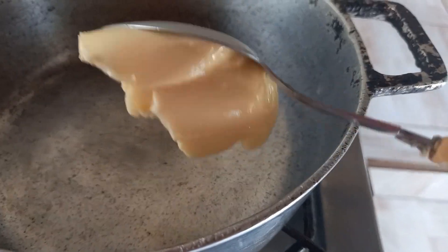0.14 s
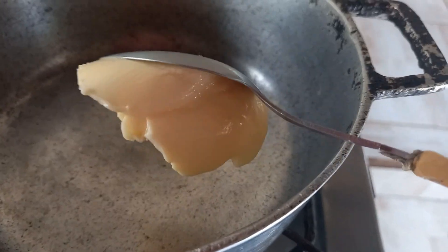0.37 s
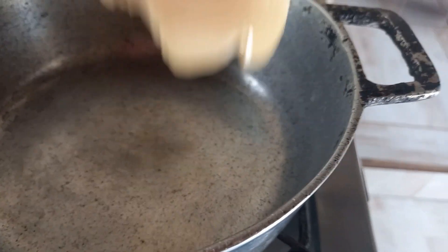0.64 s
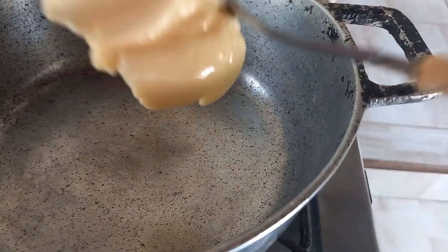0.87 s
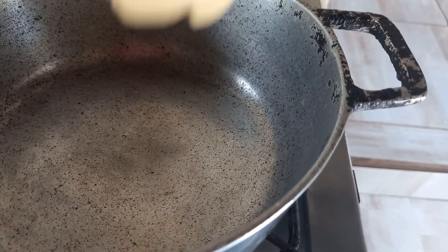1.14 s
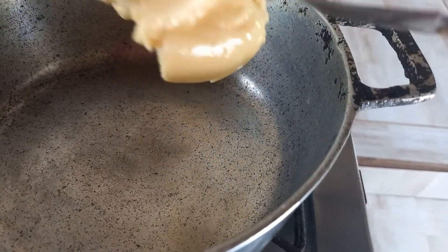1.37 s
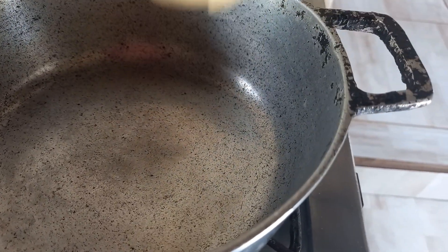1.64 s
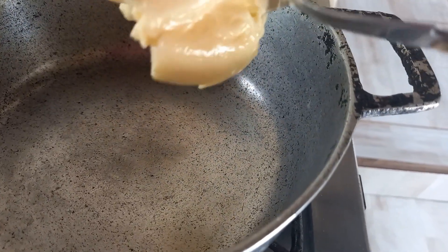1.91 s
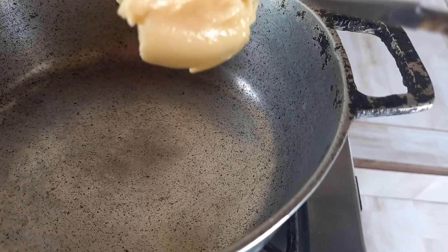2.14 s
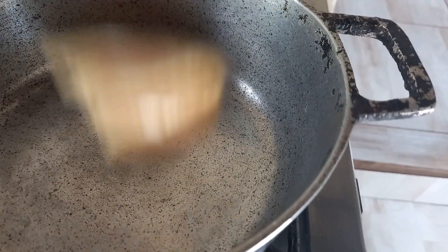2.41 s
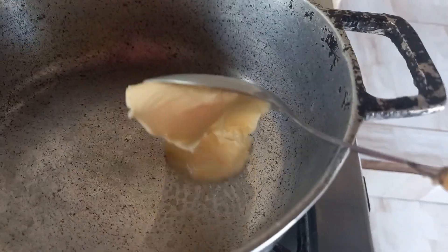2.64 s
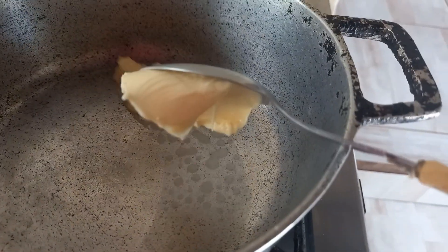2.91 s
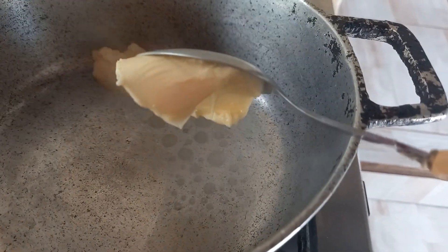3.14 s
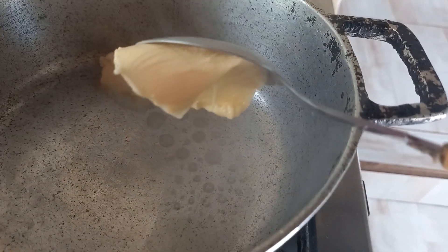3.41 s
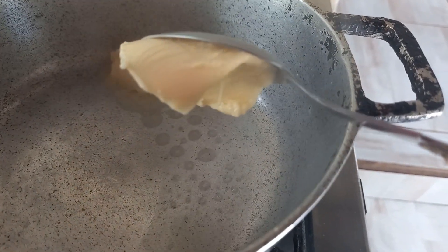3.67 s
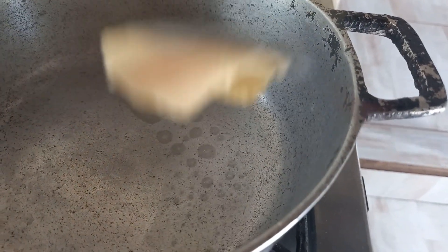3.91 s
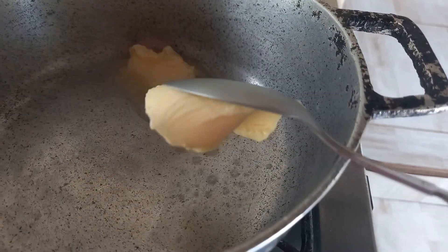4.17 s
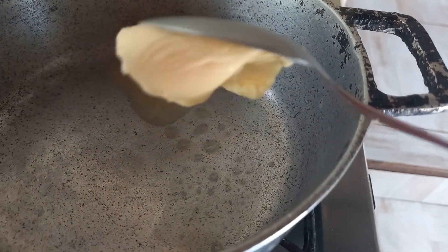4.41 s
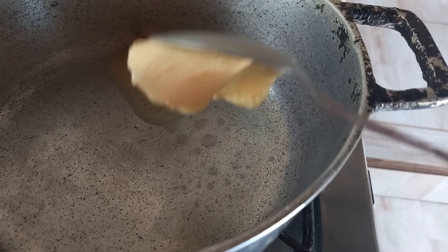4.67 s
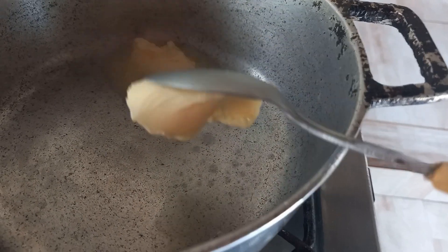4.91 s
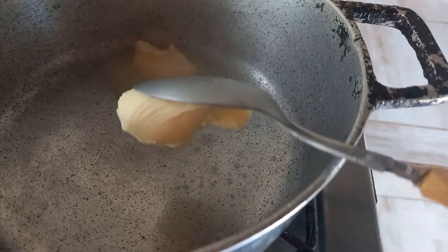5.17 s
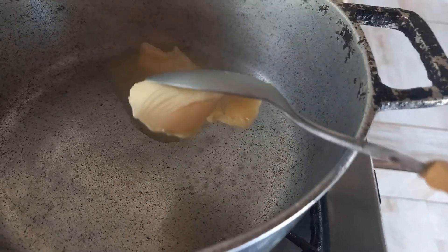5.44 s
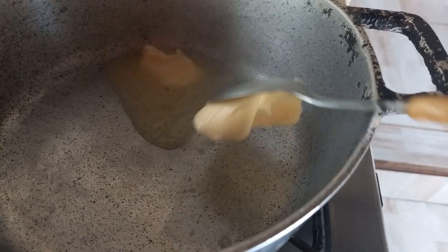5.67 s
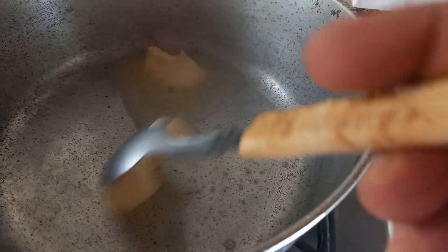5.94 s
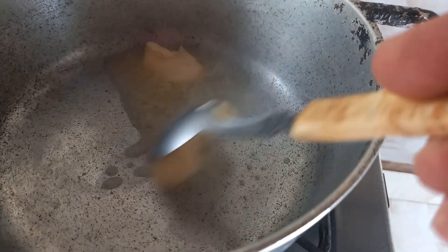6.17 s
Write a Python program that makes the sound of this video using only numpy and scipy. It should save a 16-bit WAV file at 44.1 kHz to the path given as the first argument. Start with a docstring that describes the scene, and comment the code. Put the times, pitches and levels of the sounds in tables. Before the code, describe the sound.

Close to a small microphone in a hard-walled kitchen, a metal spoon knocks a pot that rings and rattles on its stove grate. A bird trills outside over low traffic and gas hiss. A hard double clang and soft slap follow as fat lands, then sizzling grows through more knocks, ending in sharp spits.

```python
"""A spoon knocks on the rim of a hot metal pot on a gas stove, close to a small microphone: decaying sines
ring as pot and spoon modes, noise bursts make the contact, and the pot rocks on its grate and shakes the stove top.
Fat drops in with a slap and sizzles as random clicks, louder as it melts, with a few loud spits; the flame is hiss.
Beyond the kitchen a bird trills, filtered noise and low swelling tones make traffic, and a far engine's
harmonics slowly rise. Soft bumps on the stove and one finger tap on the microphone case are heard too."""
import sys
import numpy as np
from scipy import signal
from scipy.fft import rfft, irfft
from scipy.io import wavfile

SR = 44100
rng = np.random.default_rng(int(sys.argv[2]) if len(sys.argv) > 2 else 0)


def volts(x):
    """Linear amplitude factor 10**(x/20) for a level x in dB, scalar or array-like."""
    e = np.asarray(x, float) / 20
    return 10 ** e


def unload_audio(sound):
    """Save the sound as a 16-bit wav file, at the path given as the first command line argument."""
    columns = np.transpose(np.atleast_2d(sound))
    # keep every value between -1 and 1, then stretch to whole-number steps
    steps = np.round(np.clip(columns, -1, 1) * 32767)
    wavfile.write(sys.argv[1], SR, steps.astype(np.int16))


N = 278376
TIME_S = np.arange(N) / SR
SIDES = np.array([[1], [-1]])   # left, right
FAT_LANDS_S = 2.52

# spoon on pot, the first already ringing at the start: start_s, level_db, hum_db (pot modes at 500-1000 Hz),
# bright_db (high spoon modes and tick), bowl_db (clang of the bowl), freedom of the pot to ring (0-1)
BLOWS = [(-0.22, -13, -33, -5, 0, 0.74), (0.1048, -17.5, -30, -2.5, -2, 0.94),
         (0.2969, -16.5, -10, -4.5, 2.5, 0.81), (0.5113, -36.5, -30, 9, -2, 0.76),
         (0.6395, -42.5, -20, 12.5, 3, 0.9), (0.785, -48.5, -19, 3, -1, 0.7),
         (2.4959, -11, -12.5, 7.5, 9.5, 1), (2.7035, -37, 9, 3, 7, 0), (4.0157, -12.5, -7, 9.5, 1, 0.22),
         (4.548, -12.5, -14, 6.5, 0, 0.7), (4.8869, -11, -20, -8, -16, 0.77),
         (5.1654, -12, -9, 3.5, -6, 0.2), (5.728, -20.5, 2.5, 8.5, -15, 0.87),
         (5.9377, -32, -13, 17, -6, 0), (6.198, -31, -15, 5, -6, 0.4)]
# ringing modes of the pot: pitch_hz, level_db, undamped t60_s, left_over_right_db, left_leads_rad
POT_MODES = [(320, -13, 2., 0, .4), (828, -3, 2.7, 6, .9), (833, -12, 1.5, 3, 0), (1281, -4, 1., -4, .1),
             (1319, -13, 1.9, 2, .7), (1331, -9, 1.6, 0, .3), (1533, -3, 1.2, 0, -1.1),
             (1772, -5, .5, -2, -.6), (2384, -8, .5, 1, -.5), (3289, -9, .5, 9, 2.5),
             (4151, -4, .3, 6, 1.3), (5480, -9, .2, 1, -.2)]
# ringing modes of the spoon: pitch_hz, level_db, t60_s (shortened a little at each use),
# left_over_right_db, left_leads_rad
SPOON_MODES = [(1333, -2, .36, 3, .7), (1504, -6, .36, -7, -.9), (2177, 2, .22, 0, 1.2),
               (2210, -7, .2, 8, .2), (2520, -4, .24, 0, -.3), (3365, -19, .3, 4, .5),
               (4433, 0, .24, 7, 1.), (4950, -12, .2, -7, -2.5), (5181, -3, .12, -6, -.6),
               (5800, -9, .25, 9, -2.5), (6345, -13, .18, 14, -1.6), (6690, -12, .16, 15, -.3),
               (6950, -18, .16, 15, -1.5)]
# colour of the bursting steam bubbles: pitch_hz, density_db (per Hz)
SIZZLE_COLOUR = [(600, -33), (1000, -21.5), (1500, -15.5), (1950, -21), (2400, -12.5), (3400, -11),
                 (4700, -2), (6200, 0), (6900, -2.5), (7300, -13.5), (9000, -6.5), (12300, 0), (15300, -2)]


def at_hz(points, hz):
    """Reads a (Hz, value) table on a log axis."""
    table_hz, values = np.transpose(points)
    return np.interp(np.log(hz + 1), np.log(table_hz), values)


def rms_one(x):
    """Scales to rms 1."""
    return x / np.sqrt(np.mean(x ** 2) + 1e-20)


def drift(rate):
    """Slow random wander of spread 1 that turns about rate times a second."""
    return np.interp(TIME_S * rate, np.arange(400), rng.standard_normal(400))


def coloured(pair, spectrum, lean=((100, 0), (1000, 0))):
    """Mixes two unrelated signals into left and right, most alike in the bass, with a spectrum and a lean."""
    # how alike the two sides are: pitch_hz, likeness (-1 to 1)
    likeness = [(60, 0.87), (180, 1), (550, 0.54), (1650, 0.13), (4970, -0.086), (15000, 0.0056)]
    mid, side = rfft(pair)
    hz = np.arange(len(mid)) * SR / pair.shape[1]
    alike = at_hz(likeness, hz)
    both = np.sqrt(1 + alike) * mid + np.sqrt(1 - alike) * side * SIDES
    gain = volts(at_hz(spectrum, hz) + at_hz(lean, hz) * SIDES / 2)
    return rms_one(irfft(both * gain, pair.shape[1]))


def ring(x, hz, t60):
    """A resonance: a unit click sets a sine of height about 1 ringing."""
    r = volts(-60 / (t60 * SR))
    w = 2 * np.pi * hz / SR
    return signal.lfilter([0, np.sin(w)], [1, -2 * r * np.cos(w), r * r], x + 1e-18)


def add(out, s, sound):
    """Mixes a sound in at time s; a part before the start is lost."""
    i = round(s * SR)
    sound = sound[..., max(-i, 0):N - i]
    out[..., max(i, 0):max(i, 0) + sound.shape[-1]] += sound


def add_mode(out, s, db, hz, t60, lean_db, lead):
    """A dying sine, heard with its own level and phase at each side."""
    t = np.arange(int(t60 * SR)) / SR
    envelope = volts(db + lean_db * SIDES / 2 - 60 * t / t60)
    add(out, s, envelope * np.sin(2 * np.pi * hz * t + lead * SIDES / 2))


def fading(t60, size=16384):
    """An envelope that dies away by 60 dB in t60 seconds."""
    return volts(-60 * np.arange(size) / SR / t60)


def burst(spectrum, t60, size=16384):
    """Coloured noise that dies away."""
    return coloured(rng.standard_normal((2, size)), spectrum) * fading(t60, size)


def swell(s, half_s):
    """A smooth rise and fall around time s."""
    return np.cos(np.pi / 2 * np.clip((TIME_S - s) / half_s, -1, 1)) ** 2


def wavering(hz):
    """A steady tone that wanders a little in pitch, level and side."""
    phase = 2 * np.pi * np.cumsum(hz + 4.02 * drift(8)) / SR
    lead = 0.35 * drift(3) * SIDES
    return np.sqrt(2) * volts(1.3 * drift(11)) * np.sin(phase + lead)


def kitchen(x):
    """Hard walls return a diffuse tail, octave bands of noise that mostly die sooner in the treble."""
    # reverberation of the room: pitch_hz, t60_s
    room_t60 = [(100, 1), (500, 0.44), (2000, 0.51), (6000, 0.23), (14000, 0.027)]
    t, tail = np.arange(SR) / SR, 0
    for hz in 60 * 2. ** np.arange(9):
        band = [(hz / 2, -40), (hz / 1.42, -3), (hz, 0), (hz * 1.42, -3), (hz * 2, -40)]
        t60 = at_hz(room_t60, hz)
        noise = coloured(rng.standard_normal((2, SR)), band)
        tail = tail + np.sqrt(hz / t60) * noise * volts(-60 * t / t60)
    tail = tail * (1 - np.exp(-t / 0.00027))
    tail = tail / np.sqrt((tail ** 2).sum(axis=1).mean())
    return signal.fftconvolve(x.mean(axis=0, keepdims=True), tail, axes=1)[:, :N]


def street():
    """Traffic rumble and low swells; the two lowest room resonances boom on after each knock."""
    # low booms from outside: loudest_s, half_length_s, level_db, pitch_hz
    swells = [(1.117, 0.52, -49.5, 107.8), (1.14, 0.08, -46.5, 75.6), (1.86, 0.52, -58.5, 79.2),
              (3.787, 0.066, -53, 80), (4.422, 0.25, -46, 79), (4.74, 0.19, -32.5, 82),
              (4.974, 0.51, -40.5, 80.56), (5.6, 0.077, -46, 92.2), (5.814, 0.22, -37.5, 98),
              (6.274, 0.34, -45.5, 104)]
    # colour of the traffic: pitch_hz, density_db (per Hz)
    rumble_colour = [(15, -59), (25, -7.5), (82, 0.5), (216, -13.5), (262, -8.5), (328, -13.5), (405, -15),
                     (750, -46), (1200, -51), (1560, -62), (2640, -120)]
    # lowest room resonances: pitch_hz
    room_hz = (84.2, 101.1)
    boom_db, rise_s, free_t60_s = -21, 0.027, 1   # the room's boom, longest when the pot is free
    steady_db, swelling_db = -57.5, -10   # constant rumble; broad part that comes with each boom
    after, t = np.zeros(N), np.arange(2 * SR) / SR
    for s, db, *_, free in BLOWS:
        t60 = free_t60_s * max(free, .25)
        add(after, s, volts(db + boom_db - 60 * t / t60) * (1 - np.exp(-t / rise_s)))
    booms = after * sum(wavering(hz) for hz in room_hz)
    busy = after
    for s, half_s, db, hz in swells:
        envelope = volts(db) * swell(s, half_s)
        booms = booms + envelope * wavering(hz)
        busy = busy + envelope
    rumble = coloured(rng.standard_normal((2, N)), rumble_colour) * volts(2.5 * drift(6))
    return booms + (volts(steady_db) + volts(swelling_db) * busy) * rumble


def engine():
    """Far off, a few multiples of the slowly rising firing rate reach the kitchen, fading in and out."""
    # harmonics that come and go: multiple, loudest_s, half_length_s, level_db (rms)
    harmonics = [(3, 0.48, 0.41, -47.5), (6, 0.9, 0.39, -60.5), (3, 1.56, 0.49, -61.5), (5, 1.7, 0.17, -61)]
    firing_hz = 52.7 + 1.2 * (TIME_S - 0.341)   # 52.7 Hz at 0.341 s, rising 1.2 Hz per second
    phase = 2 * np.pi * np.cumsum(firing_hz) / SR
    return sum(np.sqrt(2) * volts(db) * swell(s, half_s) * np.sin(k * phase) for k, s, half_s, db in harmonics)


def bird():
    """Each chirp starts on its top note, then trills fast and unevenly down and back, deepest in the middle."""
    # chirps outside: start_s (attack begins 8 ms sooner), level_db, top_hz
    chirps = [(0.563, -42, 5740), (0.707, -36, 5800), (0.904, -36, 5850), (1.091, -36, 5730),
              (1.3047, -36, 5680), (1.6507, -38.5, 5690), (1.8078, -35.5, 5640), (2.0393, -38, 5800),
              (2.2487, -35.5, 5710)]
    trill_hz, trill_depth_hz = 95, 950
    out, t = np.zeros((2, N)), np.arange(int(.11 * SR)) / SR
    shape = np.sin(np.pi * (t / t[-1]) ** 0.26)
    for s, db, top_hz in chirps:
        waver, uneven = (np.interp(t, np.linspace(0, .11, 30), k) for k in rng.standard_normal((2, 30)))
        trill = np.sin(np.pi * np.cumsum(trill_hz * (1 + .4 * uneven)) / SR) ** 2
        dip = trill * np.sin(np.pi * t / t[-1])
        note = np.sin(2 * np.pi * np.cumsum(top_hz + 70 * waver - trill_depth_hz * dip) / SR)
        add(out, s - .008, volts(db - 7 + 2.8 * uneven) * note * shape)
    return out


def flame():
    """Smooth gas hiss: coloured noise of slightly wandering level."""
    # colour of the hiss: pitch_hz, density_db (per Hz)
    hiss_colour = [(290, -14.5), (500, -18.5), (668, -19.5), (1130, -17.5), (1510, -8), (1770, -17),
                   (1980, -11), (3290, -7), (5630, -1), (6800, -4.5), (7420, -18), (9220, -11.5),
                   (12000, -4.5), (15100, -15), (16000, -22)]
    # place of the hiss: pitch_hz, left_over_right_db
    hiss_lean = [(60, -6), (150, 1), (380, -16.5), (950, -1.5), (2380, -11), (5980, 5), (15000, -3.5)]
    return volts(-45 + .5 * drift(8.3)) * coloured(rng.standard_normal((2, N)), hiss_colour, hiss_lean)


def finger_tap():
    """A finger on the microphone case: a sudden pressure step that swings out slowly."""
    # the tap: start_s, level_db, pitch_hz, t60_s
    tap = (5.4656, -27.5, 78.5, 0.6)
    s, db, hz, t60 = tap
    out, t = np.zeros(N), np.arange(16384) / SR
    step = 1.2 * np.exp(-t / .0012)
    swing = .5 * fading(t60) * np.sin(2 * np.pi * hz * t + 2.1)
    add(out, s, -volts(db) * (step + swing))
    return signal.lfilter(np.ones(8) / 8, [1], out)   # softens the edge


def sizzle():
    """Thousands of tiny steam bubbles burst each second, in gusts; they also set the pot humming faintly."""
    # vigour of the melting fat: time_s, level_db
    vigour = [(2.67, -47.5), (2.93, -44.5), (3.6, -43), (4.07, -36), (4.45, -36), (4.66, -34),
              (6.31, -29.5)]
    # place of the sizzle: pitch_hz, left_over_right_db
    sizzle_lean = [(60, -7), (180, -21), (550, 8), (1650, 2.5), (4970, 2), (15000, 5.5)]
    vigour_db = np.interp(TIME_S, *np.transpose(vigour))
    since = TIME_S - FAT_LANDS_S
    splat = volts(-20 - 60 * np.maximum(since, 0) / 0.28)   # first splat, t60 0.28 s
    flare_db = 5 * np.exp(-((TIME_S - 3.28) / 0.33) ** 2)   # the fine spit flares as the lump slides
    spit_db = vigour_db + 7.5 + flare_db
    sizes = volts(2 * np.minimum(rng.exponential(1, (2, N)), 5)) * rng.choice([-1, 1], (2, N))
    bubbles_per_s = 9000 * volts(1.5 * drift(40))
    grains = sizes * (rng.random((2, N)) < bubbles_per_s / SR)
    hum = sum(volts(.5 * db) * rms_one(ring(grains, hz, t60)) for hz, db, t60, *_ in POT_MODES[3:])
    sound = coloured(rms_one(grains) + volts(-17) * rms_one(hum), SIZZLE_COLOUR, sizzle_lean)
    spit = signal.sosfiltfilt(signal.butter(4, 7300, "high", fs=SR, output="sos"), sound)
    body = (volts(vigour_db + 3.5) + splat) * rms_one(sound - spit)
    spit = volts(spit_db + 0.33 * drift(4.4)) * rms_one(spit)
    landing = np.clip(since / 0.025, 0, 1)
    gusts = volts(.5 * drift(15))
    return landing * gusts * (body + spit)


def pops():
    """A larger steam bubble bursts: a few milliseconds of sizzle-coloured noise."""
    # single loud spits of fat: start_s, level_db
    spits = [(5.9444, -16), (5.9904, -23), (6.0924, -16), (6.2664, -15)]
    out = np.zeros((2, N))
    for s, db in spits:
        add(out, s, volts(db - 7) * burst(SIZZLE_COLOUR, 0.029, size=1024))
    return out


def slap():
    """The soft lump flattens on the pot base: a dull, swelling thump of resonant noise."""
    rise_s = 0.008
    out, t = np.zeros(N), np.arange(8192) / SR
    squash = rms_one(ring(rng.standard_normal(8192), 716, 0.011))
    add(out, FAT_LANDS_S, volts(-19) * squash * t / rise_s * np.exp(1 - t / rise_s))
    return out


def stove_boom(rise_s):
    """The sheet metal is shaken for a moment by a soft, uneven push; loose parts clatter along."""
    # stove top sheet metal: pitch_hz, level_db, t60_s
    sheet_modes = [(85.8, -5.5, 0.15), (104, -8.5, 0.082), (158, -26, 1), (314.4, -11.5, 0.25),
                   (600, -12, 0.036)]
    # loose stove parts: pitch_hz, density_db (per Hz)
    clatter_colour = [(71, -45), (120, -11), (229, -9), (330, -6), (602, 0), (800, -3), (1050, -10),
                      (1870, -12), (2500, -11), (3250, -17), (5500, -120)]
    t = np.arange(SR) / SR
    push_shape = t / rise_s * np.exp(1 - t / rise_s)
    push = rng.standard_normal(SR) * push_shape / np.sqrt(rise_s * SR)
    clatter = volts(6) * burst(clatter_colour, 0.28, size=SR) * (1 - np.exp(-t / rise_s))
    return clatter + sum(volts(db) * ring(push, hz, t60) for hz, db, t60 in sheet_modes)


def thuds():
    """A padded bump: a low push that rings briefly and shakes the stove a little."""
    # soft bumps on the stove: start_s, level_db, pitch_hz, t60_s
    bumps = [(1.102, -43, 99, 0.21), (3.074, -30.5, 90, 0.1), (4.39, -31.5, 77, 0.39),
             (6.098, -19.5, 326, 0.17)]
    out = np.zeros((2, N))
    push = np.r_[np.hanning(60) / 30, np.zeros(20000)]
    for s, db, hz, t60 in bumps:
        add(out, s, volts(db - 11) * (ring(push, hz, t60) + 2 * push))
        add(out, s, volts(db - 26.5) * stove_boom(0.018))
    return out


def rocks():
    """The pot rocks: a short bright clink of cast iron on its base, and another shake of the stove."""
    # the pot falls back onto its grate: start_s, level_db, clink_hz, boom_db (stove)
    falls = [(0.1151, -15, 5440, -32), (0.1312, -23, 5240, -51), (0.3112, -14, 5420, -31),
             (2.52, -16, 4600, -17.5), (2.54, -11.5, 5780, -32), (2.594, -20, 5060, -22),
             (4.0191, -16, 5450, -35), (4.033, -12, 5500, -17.5), (4.05, -19, 5300, -29),
             (4.5634, -23, 5100, -42), (4.5887, -17, 5560, -36.5), (4.9005, -13, 5300, -30.5),
             (5.1849, -23.5, 5600, -27.5), (5.734, -20.5, 5120, -62)]
    # noise of the clink: pitch_hz, density_db (per Hz)
    scrape_colour = [(3000, -6.5), (4800, 0), (6800, 1), (7500, -13), (12000, -6.5), (16000, -37)]
    clink_t60_s = 0.06
    out = np.zeros((2, N))
    for s, db, hz, boom_db in falls:
        # the clink is a rough pair of modes
        add_mode(out, s, db - 6, hz, clink_t60_s, 1, -.2)
        add_mode(out, s, db - 10, hz - 130 * rng.uniform(0.58, 1.83), clink_t60_s, 2, 1.5)
        add(out, s, volts(db - 5) * burst(scrape_colour, 0.065))
        # the spoon touches again whenever the pot rocks
        for mode_hz, mode_db, t60, *sides in SPOON_MODES:
            add_mode(out, s, db + mode_db - 19.5 + rng.normal(0, 0.32), mode_hz, 0.93 * t60, *sides)
        add(out, s, volts(boom_db - 6) * stove_boom(0.012))
    return out


def blows():
    """Each knock strikes every mode of pot and spoon; a resting spoon and the fat damp the pot."""
    # noise of the contact: pitch_hz, density_db (per Hz)
    crack_colour = [(500, -25.5), (900, -28.5), (1500, -10), (2300, -2), (3200, -10), (4500, -2),
                    (6500, -11), (7400, -23.5), (12000, -12), (16000, -35)]
    # first instant of the contact: pitch_hz, density_db (per Hz)
    tick_colour = [(2000, -3), (6800, 1), (7600, -13), (16000, 5)]
    # modes of the spoon's bowl: pitch_hz
    bowl_hz = (2520, 4433)
    spoon_damping, fat_damping = 1.4, 0.7   # added to 1 / t60 at 800 Hz (per s)
    rings, noise = np.zeros((2, 2, N))
    for s, db, hum_db, bright_db, bowl_db, free in BLOWS:
        over_firm_db = db + 15   # against a firm blow
        in_fat = s > FAT_LANDS_S - .1
        for hz, mode_db, t60, *sides in POT_MODES:
            loss = spoon_damping * (1 - free) + fat_damping * (in_fat and hz > 1000)
            damped_t60 = 1 / (1 / t60 + loss * (hz / 800) ** 0.1)
            if 500 < hz < 1000:
                extra_db = hum_db
            else:   # these modes take a share of the hum's swing and grow more slowly than the blow
                extra_db = -5.5 + 0.17 * hum_db - 0.4 * over_firm_db
            add_mode(rings, s, db + mode_db + extra_db - 9 + rng.normal(0, 1), hz, damped_t60, *sides)
        for hz, mode_db, t60, *sides in SPOON_MODES:
            if hz in bowl_hz:
                extra_db = bowl_db * hz / max(bowl_hz)
            else:
                extra_db = bright_db * (hz > 3000)
            add_mode(rings, s, db + mode_db + extra_db - 11 + rng.normal(0, 1), hz, 0.89 * t60, *sides)
        contact_db = db + 0.2 * over_firm_db   # contact noise grows faster than the blow
        add(noise, s, volts(contact_db - 4.5) * burst(crack_colour, 0.031))
        add(noise, s, volts(contact_db - 14) * burst(crack_colour, 0.29))   # dense modes too close to tell apart
        add(noise, s, volts(contact_db + bright_db - 3) * burst(tick_colour, 0.01, size=400))
        add(noise, s, volts(db - 16) * stove_boom(0.018))
    return rings, noise


def scene():
    """Knocks and bird share the room's echo; steady sounds lie under them."""
    background = street() + engine() + flame() + finger_tap()
    chirps = bird()
    fat = sizzle() + pops()
    rings, contact = blows()
    knocks = contact + rocks() + thuds() + slap()
    wet = kitchen(volts(-2) * knocks + volts(-13) * rings + chirps)
    near = rings + knocks * volts(.7 * SIDES)   # knocks lean to the left
    return near + volts(-4.5) * chirps + wet + fat + background


def band_limit(x):
    """A steep low-pass at the top of the band."""
    return signal.sosfilt(signal.butter(12, 17020, fs=SR, output="sos"), x)


def record(dry):
    """Small microphone ports lose the deepest bass; peaks stop at full scale and the top is cut."""
    x = signal.sosfilt(signal.butter(4, 55, "high", fs=SR, output="sos"), dry)
    x = np.clip(x, -1, 1)
    x = signal.sosfilt(signal.cheby2(20, 50, 15950, fs=SR, output="sos"), x)
    return band_limit(x)


dry = scene()
out = record(dry)
unload_audio(out)
```